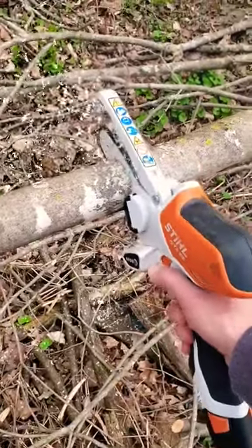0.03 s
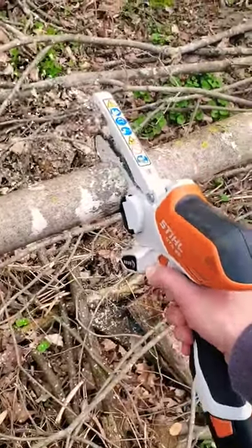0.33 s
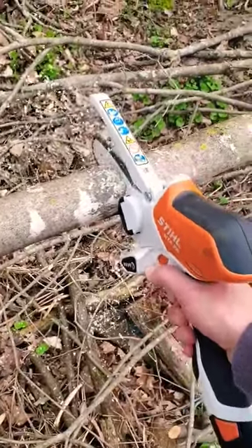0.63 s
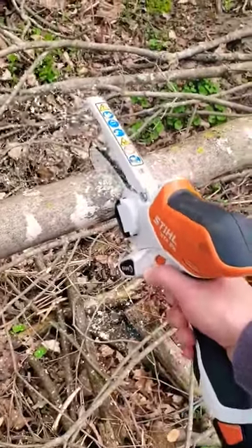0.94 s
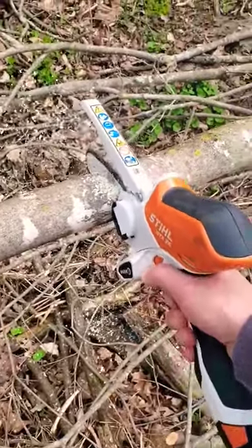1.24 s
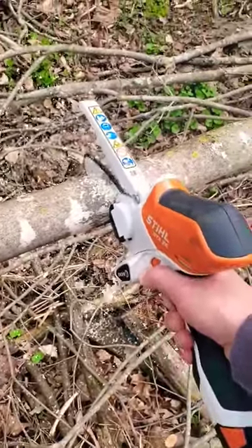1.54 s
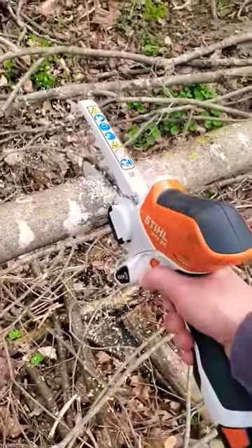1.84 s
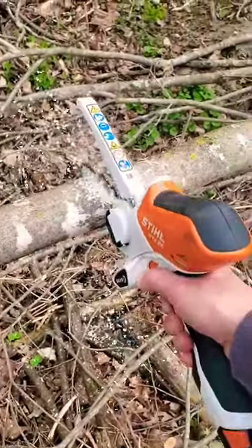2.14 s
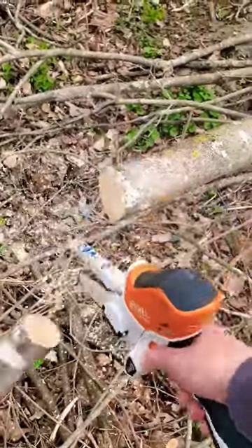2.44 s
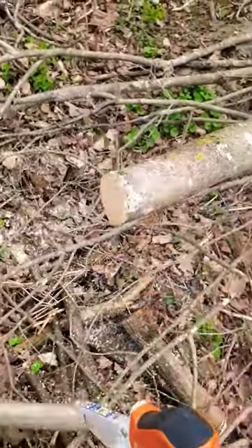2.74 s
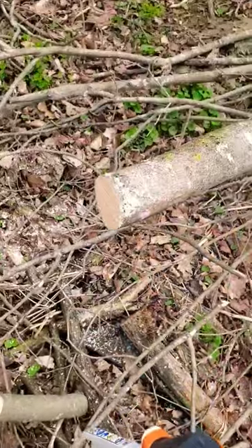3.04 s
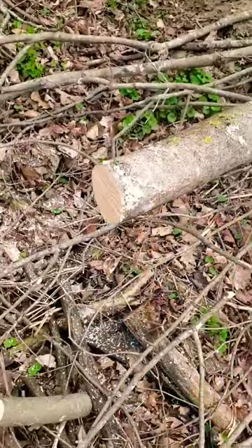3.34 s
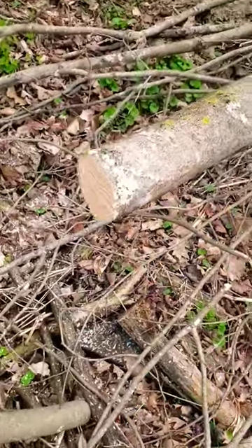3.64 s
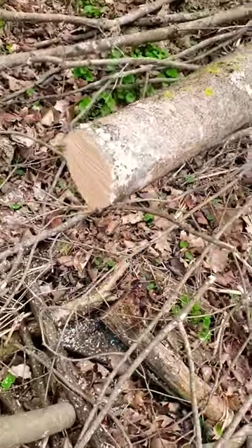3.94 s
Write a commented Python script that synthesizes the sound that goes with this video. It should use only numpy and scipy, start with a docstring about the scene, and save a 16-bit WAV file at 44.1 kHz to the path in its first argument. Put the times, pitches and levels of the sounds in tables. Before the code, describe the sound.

Close up outdoors, a small battery chainsaw whines and rasps through a log, slowing and chattering before it breaks through. The cut piece clacks and thuds to the ground while the chain ticks to a stop in light wind.

```python
"""Battery chainsaw through a log

Close up and outdoors, cutters tear the wood while chain and gear sing. The saw slows and chatters as
the kerf closes, breaks through, races briefly and coasts down with a ticking chain. The offcut clacks
against the bar and thuds onto the ground; a twig snaps and a light wind touches the microphone."""
import sys
import numpy as np
from scipy import signal
from scipy.fft import rfft, irfft, next_fast_len
from scipy.io import wavfile
from scipy.ndimage import uniform_filter1d, map_coordinates

SR = 44100
rng = np.random.default_rng(int(sys.argv[2]) if len(sys.argv) > 2 else 0)


def file_out(sig):
    """Save sig as 16-bit WAV at sys.argv[1]."""
    # one column per channel
    cols = np.atleast_2d(sig).T
    # limit, then scale
    lim = np.clip(cols, -1, 1)
    pcm = np.round(lim * 32767).astype(np.int16)
    wavfile.write(sys.argv[1], SR, pcm)


N = 176400

FREE_HZ = 283.8  # cutters per second with no load
RELEASE_S = 0.015  # time constant of the tearing as it dies

# resonances of the guide bar: freq_hz, gain_db
BAR_RESONANCE = [(200,-31),(2700,-42),(3200,0.5),(3450,0.5),(3700,-10),(4100,-32),(10000,-34),(11100,-6),(12300,-35)]
# evenness of the run; chain and gear tones fade as it falls: time_s, gain_db
RUN_EVENNESS = [(0,-4.5),(.6,-1),(1.0,.5),(1.3,0),(1.55,-5),(1.82,-2),(1.97,-18)]
# position of the saw: time_s, left_minus_right_db, left_lag_ms
SAW_POSITION = [(2.3,0.5,-0.081),(2.9,0,.15),(3.7,-1.5,0.19)]


def amp(db):
    """Decibels to gain."""
    return 10 ** (np.asarray(db) / 20)


def pan(left_minus_right_db):
    """Left and right gains."""
    return amp(np.array([[.5], [-.5]]) * left_minus_right_db)


def unit(x):
    """Scale to rms 1."""
    return x / np.sqrt(np.mean(x ** 2) + 1e-20)


def clock():
    """Time of every sample."""
    return np.arange(N) / SR


def since(start_s):
    """Seconds elapsed, zero before the start."""
    return np.maximum(clock() - start_s, 0)


def curve(rows, column=1):
    """Automation: (time_s, value) points joined by lines."""
    return np.interp(clock(), *np.transpose(rows)[[0, column]])


def along(points, hz):
    """Read (freq_hz, value) points on a log axis."""
    freqs, values = np.transpose(points)
    return np.interp(np.log(hz + 1), np.log(freqs + 1), values)


def wobble(rate):
    """A smooth random curve, rate knots a second."""
    return map_coordinates(rng.standard_normal(2000), [clock() * rate], mode="mirror")


def filtered(x, response):
    """EQ with a gain given as a function of frequency."""
    size = next_fast_len(N + 8192)
    return irfft(rfft(x, size) * response(np.fft.rfftfreq(size, 1 / SR)), size)[..., :N]


def rasp(gate, spectrum):
    """Gated stereo noise, coloured by the part that radiates it; rms 1."""
    # likeness of left and right: freq_hz, correlation
    likeness = [(130,1),(400,0.9),(1100,0.5),(2400,0.7),(3400,0.5),(8000,0.02)]

    def colour(hz):
        width = np.arccos(np.clip(along(likeness, hz), -1, 1)) / 2
        return amp(along(spectrum, hz)) * [np.cos(width), np.sin(width)]

    mid, side = filtered(gate * rng.standard_normal((2, N)), colour)
    return unit(np.array([mid + side, mid - side]))


def strikes(rate, decay_s, scatter_db):
    """A gate of mean power 1 that jumps to a random height once a cycle and dies away."""
    turns = np.cumsum(rate) / SR
    height = amp(scatter_db * rng.uniform(-1, 1, 8000))[turns.astype(int)]
    decay = np.exp(-(turns % 1) / rate / decay_s)
    power = rate * decay_s / 2 * (1 - np.exp(-2 / (rate * decay_s)))
    return unit(uniform_filter1d(height * decay / np.sqrt(power), size=16))


def blow(start_s, attack_s, t60_s):
    """Envelope of one impact."""
    age = since(start_s)
    return (1 - np.exp(-age / attack_s)) * amp(-60 * np.minimum(age / t60_s, 5))


def tone(rate, multiple, flutter_db, jitter, skew=0):
    """One order of the drive, uneven in level and phase; skew puts the two ears out of step."""
    phase = 2 * np.pi * multiple * np.cumsum(rate) / SR + jitter * wobble(130)
    return unit(amp(flutter_db * wobble(70)) * np.sin(phase + np.array([[-.5], [.5]]) * skew))


def cutter_rate():
    """Cutters per second: loaded, racing once free, then coasting against dry friction."""
    # saw speed under load: time_s, rate_hz
    loaded = [(0.0, 240.8), (0.25, 239.4), (0.55, 249.5), (0.68, 252.8), (0.73, 248.6), (1.05, 253.4),
              (1.39, 243.3), (1.46, 258.5), (1.54, 258.9), (1.6, 266.2), (1.8, 253.7), (1.98, 218.1),
              (2.08, 209), (2.17, 221), (2.24, 203.9), (2.4, 199.9)]
    trigger_off_s, coast_s, friction_hz = 2.6, .72, 23.07
    driven = curve(list(loaded) + [(trigger_off_s - .05, FREE_HZ)])
    slowed = (driven + friction_hz) * np.exp(-since(trigger_off_s) / coast_s) - friction_hz
    return np.maximum(slowed, 3) * (1 + 0.00205 * wobble(45))


def in_wood():
    """1 until the bar breaks through, then a quick fade to 0."""
    return np.exp(-since(2.4) / RELEASE_S)


def breeze():
    """Low lumpy wind, different at each microphone port."""
    # wind colour: freq_hz, gain_db
    spectrum = [(20,-28),(45,-6.5),(72,0),(110,-15.5),(250,-27.5),(1000,-31),(4000,-51)]
    # gusts: time_s, level_db
    gusts = [(0,-59),(.8,-50.5),(1.45,-61.5),(2.7,-48),(3.2,-51.5),(3.8,-45.5),(3.86,-42)]
    air = rng.standard_normal((2, N)) + 0.72 * rng.standard_normal(N)
    rumble = filtered(air, lambda hz: amp(along(spectrum, hz)))
    return unit(rumble * amp(1.3 * wobble(9))) * amp(curve(gusts)) * pan(-2.4)


def clacks():
    """The offcut hits the bar and the brush, then a twig snaps: each a short burst in its own band."""
    # sharp contacts: start_s, level_db, centre_hz, width_octaves, t60_s
    cracks = [(2.583,-3,2700,0.39,0.018),(2.5841,-7.5,1200,0.37,0.022),(2.5843,-8.5,5000,0.3,0.02),(2.592,-20,2997,0.33,0.056),(2.644,-23,2000,0.98,.05),(3.223,-27,5600,0.4,.04)]
    out = np.zeros((2, N))
    for start_s, db, centre_hz, octaves, t60_s in cracks:
        noise = rng.standard_normal(N) + .5 * rng.standard_normal((2, N))
        band = filtered(noise, lambda hz: np.exp(-.5 * (np.log2((hz + 1) / centre_hz) / octaves) ** 2))
        out += amp(db) * unit(band) * blow(start_s, attack_s=0.0012, t60_s=t60_s)
    return out


def offcut():
    """The piece lands with a dull knock and a short wooden ring, too small to radiate much bass."""
    # landing and bounce: start_s, level_db
    thuds = [(2.6986,0),(2.7186,-7.5)]
    # modes of the piece: pitch_hz, gain_db, t60_s
    modes = [(414,-20.5,0.05),(514,2,0.011),(704,3.5,0.008),(1720,-13.5,0.056),(2070,-27,0.22)]
    ring = np.zeros(N)
    for start_s, level_db in thuds:
        for hz, gain_db, t60_s in modes:
            envelope = amp(level_db + gain_db) * blow(start_s, attack_s=0.0013, t60_s=t60_s)
            ring += envelope * np.sin(2 * np.pi * hz * since(start_s))
    return signal.sosfilt(signal.butter(2, 325, "highpass", fs=SR, output="sos"), ring)


def coasting(rate):
    """The free drive hums and whirrs, fading as it slows; its tones fall through the housing's peak."""
    # tones of the free drive: cutter_rate_multiple, level_db
    orders = [(2,-50),(6,-42.5),(8.5,-43),(17,-43.5)]
    # resonance of the motor housing: freq_hz, gain_db
    housing = [(270,-15),(380,-6),(600,-7),(1100,.5),(1450,-3),(1900,-11),(3500,-28)]
    # colour of the housing's whirr: freq_hz, gain_db
    whirr_spectrum = [(300,-17),(800,-13),(1100,-5),(1500,-11.5),(3000,-17.5),(9000,-45)]
    hum = sum(amp(db + along(housing, k * rate)) * tone(rate, k, flutter_db=3, jitter=.6)
              for k, db in orders)
    whirr = amp(-39.5) * rasp(1 + strikes(rate, decay_s=0.0036, scatter_db=2), whirr_spectrum)
    octaves = np.log2(rate / FREE_HZ)
    return (1 - in_wood()) * (amp(7.2 * octaves) * hum + amp(5.6 * octaves) * whirr)


def gear(rate):
    """The loaded gear whines, frays as the run turns uneven and locks to a squeal in the bar's peak."""
    teeth = 17
    lift_db = .37 * np.maximum(along(BAR_RESONANCE, teeth * rate) + 22, 0)
    even_db = np.maximum(curve(RUN_EVENNESS), -5)
    jitter = (.65 - .06 * even_db) * amp(-lift_db)
    whine = tone(rate, teeth, flutter_db=2.6, jitter=jitter, skew=.8 - .35 * lift_db)
    return in_wood() * amp(-28.3 + lift_db + even_db) * whine


def sprocket(rate):
    """Links landing on the sprocket hum, and sing while the chain runs evenly under load."""
    # chain tones under load: cutter_rate_multiple, level_db, left_minus_right_db
    orders = [(4,-28,0),(13,-35.5,-6)]
    song = sum(amp(db) * pan(side_db) * tone(rate, k, flutter_db=1.8, jitter=0.4)
               for k, db, side_db in orders)
    hum = amp(-44.5) * tone(rate, 2, flutter_db=2.0, jitter=0.74)  # two drive links per cutter
    return in_wood() * (amp(curve(RUN_EVENNESS)) * song + hum)


def chain(rate):
    """Links slide in the bar's groove and tick round its tip; slower links scrape for longer."""
    # sliding hiss: freq_hz, gain_db
    slide_spectrum = [(100,-15),(300,-14.5),(700,-12),(1150,-4),(2100,2.5),(3300,4),(4500,4.5),(6300,2.5),(7700,-2),(10500,0.5),(12900,0),(15500,-8.5)]
    # metallic ticks: freq_hz, gain_db
    tick_spectrum = [(300,-30),(2000,-13),(4400,-5.5),(6300,-8),(7700,-10),(11200,-6),(12100,-2),(12850,7),(13700,0),(15500,1.5)]
    # the chain fades as it slows and is swung away: time_s, level_db
    fader = [(0,-26.5),(2.3,-27.5),(2.45,-27),(2.63,-29),(2.85,-31),(3.05,-37),(3.25,-40),(3.6,-50),(3.8,-57),(4,-65)]
    friction = 1 + .3 * strikes(rate, decay_s=.0012, scatter_db=4)
    slide = rasp(friction * amp(1.2 * wobble(40)), slide_spectrum)
    scrape_s = .0012 * np.sqrt(FREE_HZ / rate)
    links = strikes(2 * rate, decay_s=scrape_s, scatter_db=6)
    cutters = .6 * strikes(rate, decay_s=scrape_s, scatter_db=5)
    ticks = rasp((links + cutters) * amp(1.1 * wobble(51) + 1.2 * wobble(22)), tick_spectrum)
    tick_db = -0.6 - np.log2(rate / FREE_HZ)  # ticks stand out as the chain slows
    return amp(curve(fader)) * (slide + amp(tick_db) * ticks)


def cutting(rate):
    """Each cutter tears a chip; the pinched bar rings in bursts, and now and then knocks in the closing kerf."""
    # colour of tearing wood: freq_hz, gain_db
    wood_spectrum = [(100,-27),(250,-18.5),(420,-8),(560,-9),(720,1.5),(850,-4),(1040,5),(1400,-9.5),(2050,3),(2450,-1.5),(3400,4),(3900,-0.5),(4900,-3),(5700,-0.5),(7300,-4.5),(9200,-9.5),(11500,-5.5),(15500,-4.5)]
    # bite of the cutters: time_s, relative_db
    bite = [(0.0, -22), (1.01, -22.5), (1.91, -21), (2.35, -22), (2.37, -18.5), (2.39, -22)]
    # bar chatter in the closing kerf: time_s, level_db
    chatter = [(0,-39.5),(1.72,-37.5),(1.88,-29.5),(2.02,-21.5),(2.17,-23.5),(2.28,-18.5),(2.39,-25)]
    # knock of the bar: freq_hz, gain_db
    knock_spectrum = [(100,-26),(300,-7.5),(450,-7.5),(1000,8),(1400,-6),(2100,-7),(3400,-5),(6000,-7),(15000,-33)]
    # the bar knocking in the closing kerf: start_s, relative_db
    bar_knocks = [(1.329, -21), (1.36, -19), (1.622, -20), (1.95, -17), (1.992, -14.5), (2.033, -16.5),
                  (2.059, -11), (2.165, -12.5), (2.275, -9.5), (2.291, -15), (2.307, -16), (2.364, -15)]
    chips = (1.3 + strikes(rate, decay_s=.0022, scatter_db=5)) * amp(wobble(80))
    tear = rasp(chips, wood_spectrum) * amp(curve(bite) + 1.63)
    bar_hits = strikes(rate, decay_s=0.01, scatter_db=2.5) * amp(1.6 * wobble(80))
    ring = rasp(bar_hits, BAR_RESONANCE) * amp(curve(chatter))
    jolts = sum(amp(db - 3.0) * blow(start_s, attack_s=0.00097, t60_s=0.046) for start_s, db in bar_knocks)
    knocks = rasp(1, knock_spectrum) * jolts
    drop_s = 2.595  # the chain grazes the cut face until the piece drops
    graze = amp(-8.5) * (1 - in_wood()) * np.exp(-since(drop_s) / RELEASE_S)
    return in_wood() * (tear + ring + knocks) + graze * tear


def ear_lag(x):
    """The saw's sound reaches the nearer ear first."""
    half_lag = curve(SAW_POSITION, column=2) / 1000 * SR / 2
    return np.array([map_coordinates(ear, [np.arange(N) + sign * half_lag], order=5)
                     for ear, sign in zip(x, (-1, 1))])


def scene():
    """The saw close by, the falling piece and the open air."""
    # stereo spread of the saw's rattle: freq_hz, left_minus_right_db
    spread = [(160, 2), (450, -4.5), (800, -2.5), (1400, 12), (2010, -3.5), (3330, -1.5), (5500, -3.5),
              (9080, 4.5), (15000, 1)]
    rate = cutter_rate()
    rattle = filtered(cutting(rate) + chain(rate), lambda hz: pan(along(spread, hz)))
    saw = ear_lag(rattle + sprocket(rate) + coasting(rate)) + gear(rate)
    return saw * pan(curve(SAW_POSITION)) + clacks() + offcut() + breeze()


def record(dry):
    """The right microphone port has a notch in the treble; both sides lose the very top."""
    notch_hz, notch_width_hz, top_hz = 7900, 530, 15600
    left, right = dry
    right = filtered(right, lambda hz: np.tanh(np.abs(hz - notch_hz) / notch_width_hz))
    return filtered(np.array([left, right]), lambda hz: hz < top_hz)


dry = scene()
out = record(dry)
file_out(out)
```